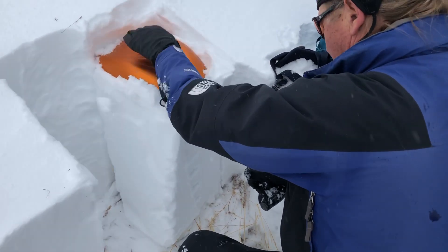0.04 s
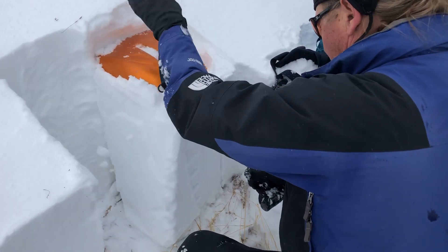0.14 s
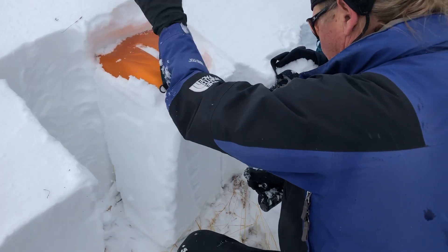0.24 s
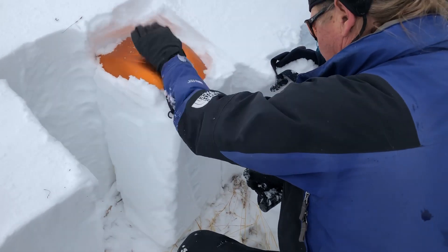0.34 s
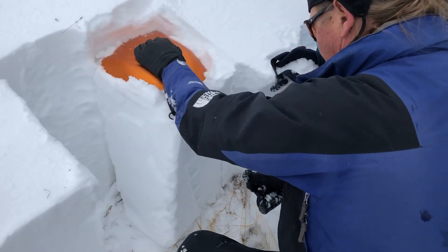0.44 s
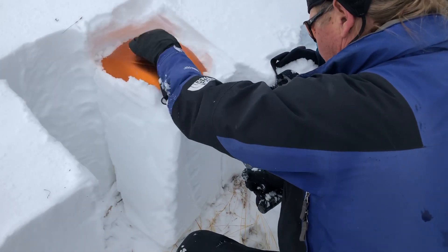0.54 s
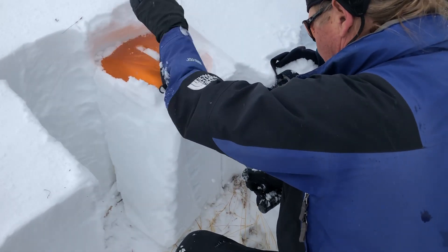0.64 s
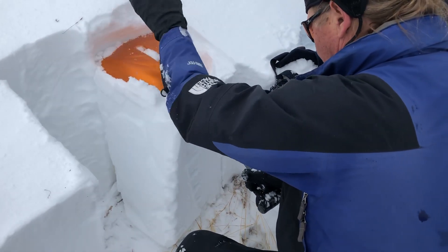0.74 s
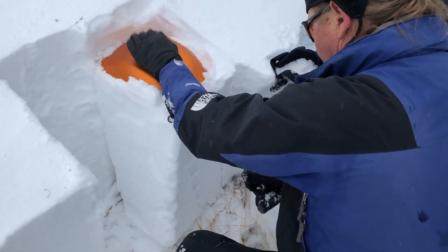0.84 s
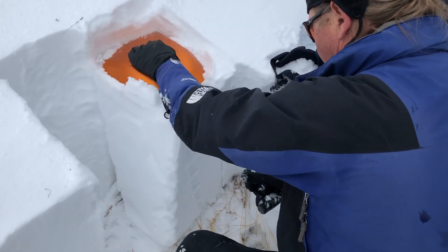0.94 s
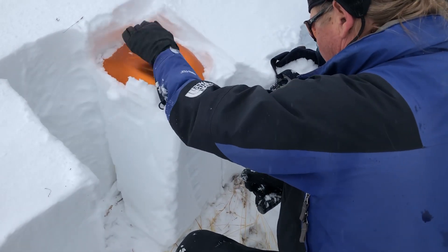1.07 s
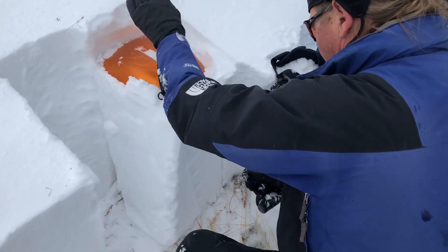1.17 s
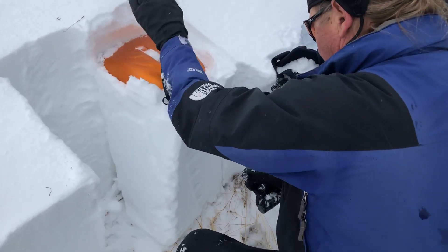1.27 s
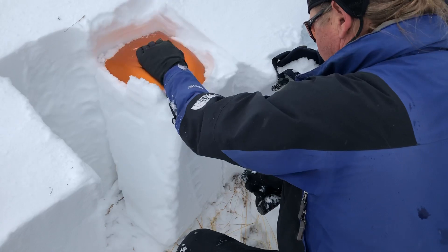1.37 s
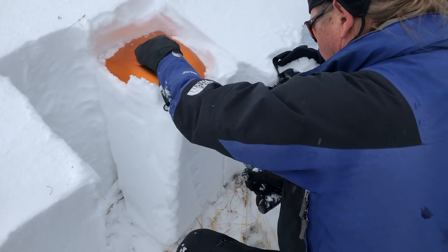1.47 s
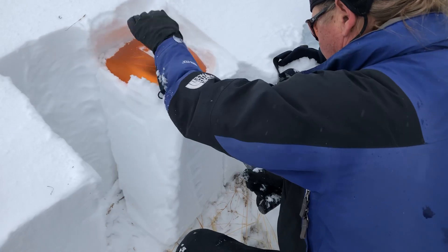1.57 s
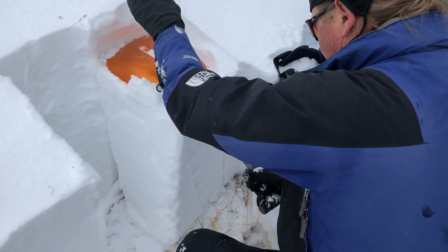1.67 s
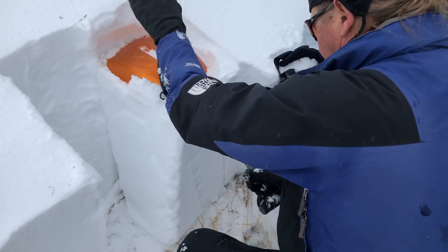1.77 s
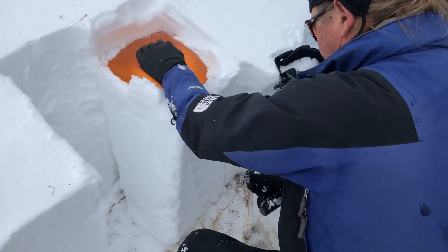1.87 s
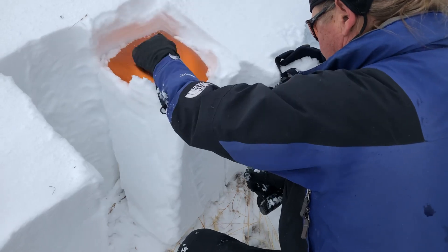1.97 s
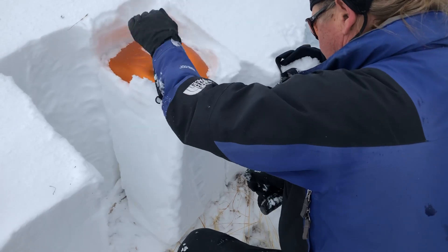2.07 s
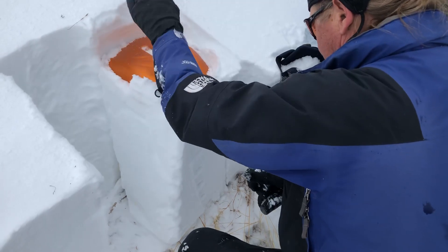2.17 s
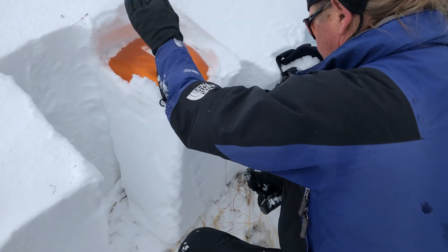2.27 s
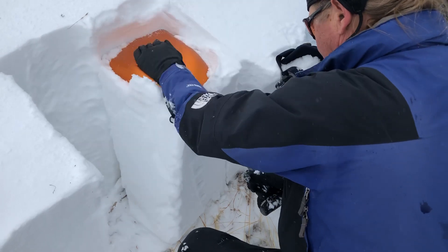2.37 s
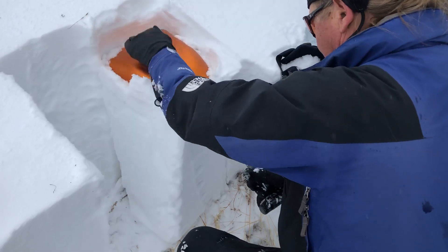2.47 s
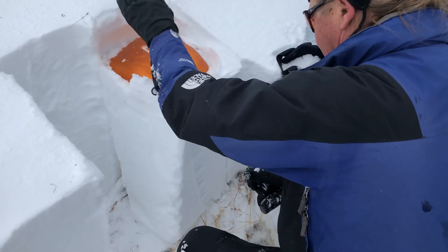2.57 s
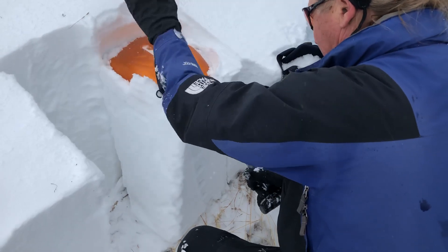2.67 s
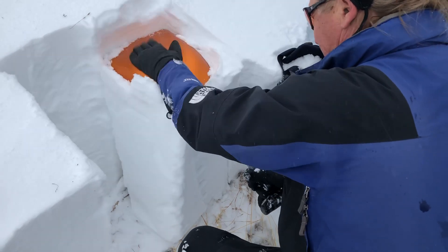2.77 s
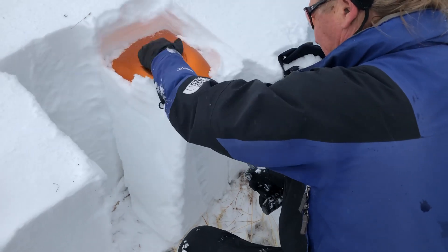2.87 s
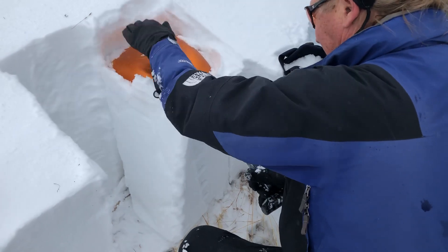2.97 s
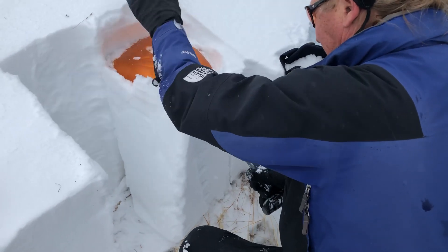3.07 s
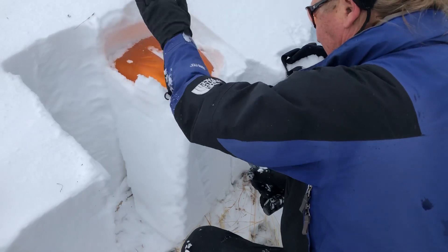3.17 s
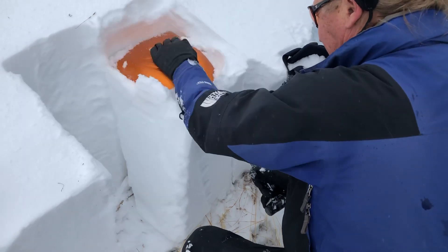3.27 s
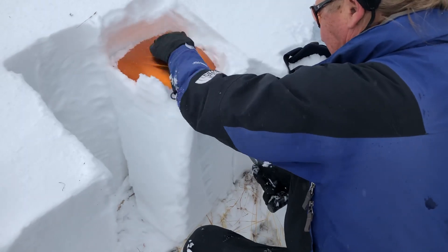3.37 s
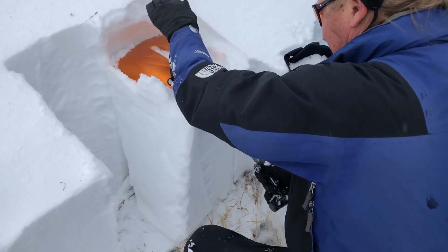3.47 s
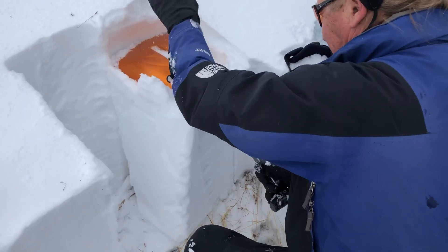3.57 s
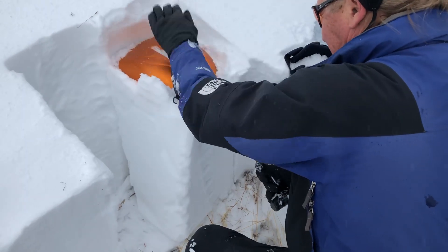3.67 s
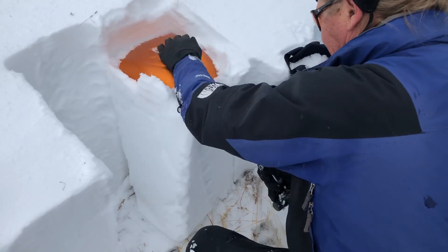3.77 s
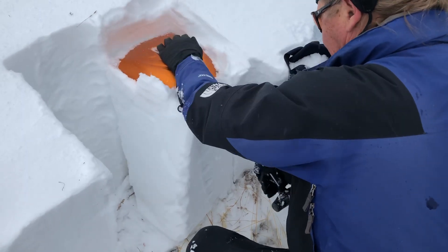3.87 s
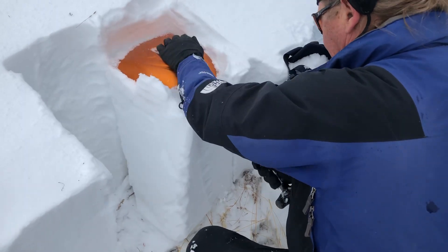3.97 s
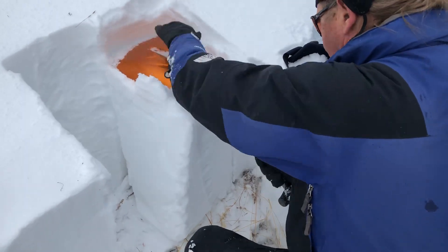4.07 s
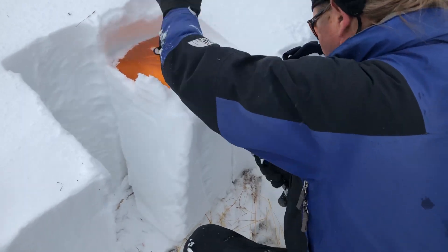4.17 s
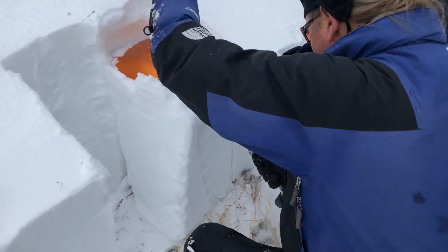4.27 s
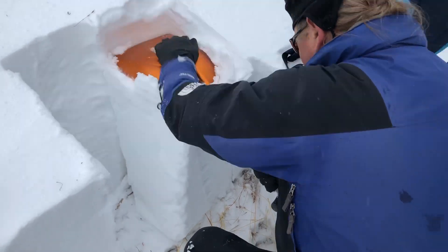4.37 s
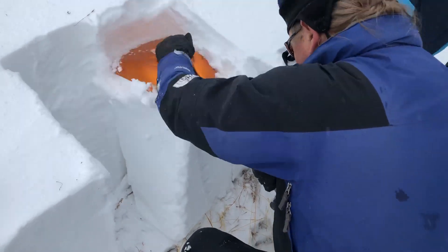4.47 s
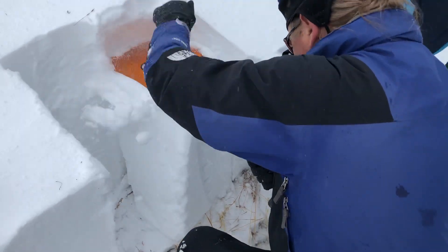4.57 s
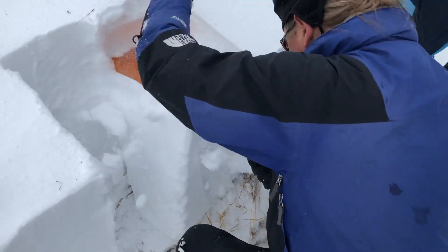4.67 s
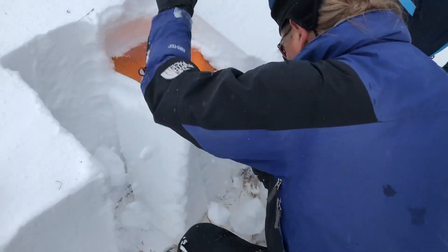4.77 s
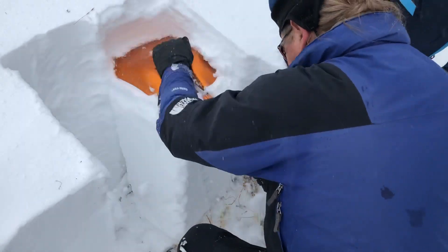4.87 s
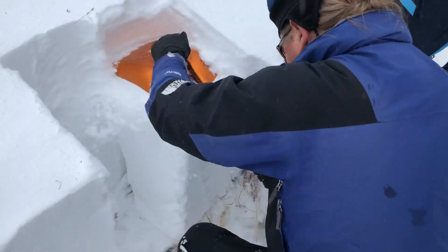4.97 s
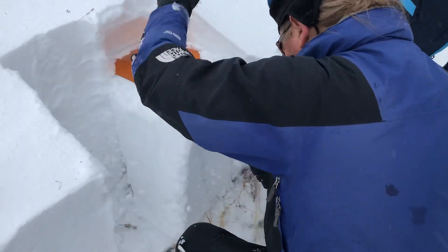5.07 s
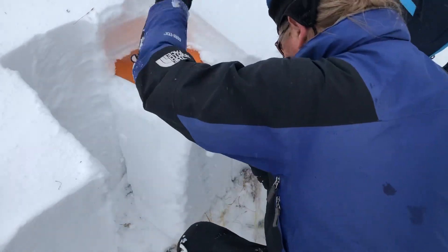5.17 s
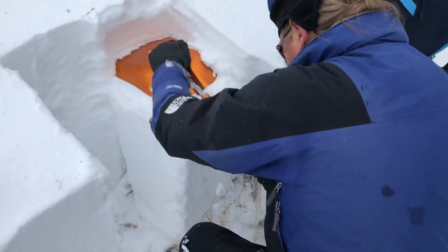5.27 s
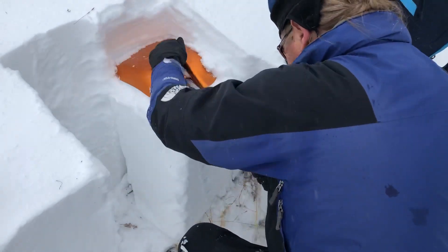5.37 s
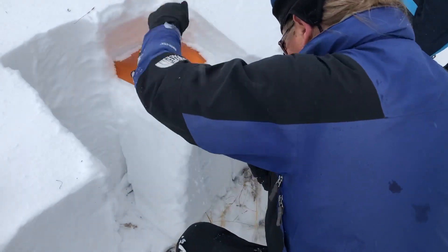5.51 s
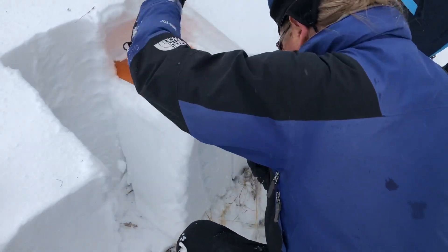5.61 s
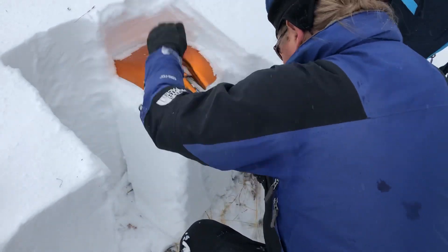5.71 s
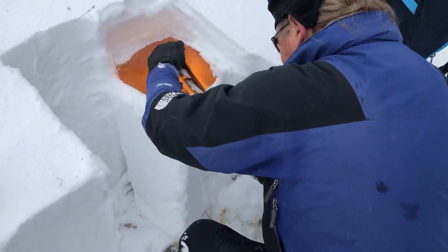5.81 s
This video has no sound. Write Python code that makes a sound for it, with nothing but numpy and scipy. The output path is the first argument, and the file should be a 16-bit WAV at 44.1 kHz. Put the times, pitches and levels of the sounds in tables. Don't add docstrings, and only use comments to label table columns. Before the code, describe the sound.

Outdoors on open snow, a gloved hand pats a metal shovel blade lying on a snow block, roughly twice a second. Each hit is a short crunch, a damped slap and a deep thump. The later hits are harder, and snow crumbs tick and trickle down more. Light wind rumbles on a phone microphone about an arm's length away, with no echo.

```python
import sys
import numpy as np
from scipy import signal
from scipy.fft import rfft, irfft
from scipy.io import wavfile
from scipy.ndimage import uniform_filter1d

SR = 44100
rng = np.random.default_rng(int(sys.argv[2]) if len(sys.argv) > 2 else 0)


def attenuation_scalar(level_db):
    decades = np.asarray(level_db, float) / 20
    return 10 ** decades


def transcribe(u):
    v = np.clip(np.atleast_2d(u).T, -1, 1)
    q = np.round(v * 32767).astype(np.int16)
    wavfile.write(sys.argv[1], SR, q)


N = 257717

# slap in seconds, strength in dB, glove contact before the slap in ms,
# slap over crunch in dB, brightness in dB.
PATS = [(0.41, 5.5, 5.2, 13.5, -9.5), (0.908, -5.5, 5.6, 0.5, -2), (1.408, -0.3, 4.79, 9, -7),
        (1.8796, 3.5, 4.9, 13, -13.5), (2.3609, -3, 4.9, 13.5, -5.5), (2.8299, -1.3, 3.0, 10, -9),
        (3.287, 6, 5.1, 19.5, -8.5), (3.724, -0.7, 6.6, 0.5, 0.2), (4.4284, 10, 4.2, 17, -1.5),
        (4.8849, 5, 5.4, 10, 0), (5.3308, 4.5, 4.6, 17, -2), (5.777, 3, 3.1, 7, 2.6)]
# time in seconds, level in dB.
STIR = [(0.0, -76.5), (0.52, -68.5), (0.65, -77), (1.36, -76), (1.53, -74), (2.32, -74.5), (2.47, -68.5),
        (3.12, -74), (3.67, -70), (4.1, -57.5), (4.77, -56.5), (5.07, -62.5), (5.84, -59.5)]
STILL_DB = -73.5
# frequency in Hz, density in dB per Hz.
DUST = [(300, -19.5), (1000, -0.5), (2000, -2.5), (3200, -0.5), (7200, -3), (11000, -9), (15400, -10),
        (15900, -41.5)]
# frequency in Hz, density in dB per Hz.
WIND = [(22, 38), (32, 33), (45, 20), (60, 7), (85, -4), (180, -7), (300, -18), (600, -40), (15000, -90)]


def coloured(points):
    hz, db = np.transpose(points)
    log_hz = np.log(np.arange(1, N // 2 + 2) * SR / N)
    gain = attenuation_scalar(np.interp(log_hz, np.log(hz), db))
    x = irfft(rfft(rng.standard_normal(N)) * gain, N)
    return x / np.std(x)


def band(x, hz, width_hz):
    return signal.lfilter(*signal.iirpeak(min(hz, .45 * SR), hz / width_hz, fs=SR), x)


def between(x, lo_hz, hi_hz):
    sos = signal.butter(2, [lo_hz, min(hi_hz, .45 * SR)], "band", fs=SR, output="sos")
    return signal.sosfilt(sos, x)


def walk(rate_hz):
    k = int(SR / rate_hz)
    steps = np.repeat(rng.standard_normal(N // k + 1), k)
    return 1.3 * uniform_filter1d(uniform_filter1d(steps, k), k)[:N]


def add(out, start_s, x):
    i = max(int(start_s * SR), 0)
    out[i:i + len(x)] += x[:N - i]


def stirring():
    return np.interp(np.arange(N) / SR, *np.transpose(STIR)) - STILL_DB


def air():
    # time in seconds, level in dB.
    breeze = [(0, -66.5), (.6, -72), (1.1, -71), (1.45, -61), (2.0, -58.5), (2.3, -62), (2.6, -70.5),
              (3.5, -71), (3.9, -61), (4.4, -63), (4.7, -65), (5.84, -56)]
    # frequency in Hz, density in dB per Hz.
    hush_spectrum = [(100, -3.5), (180, 1), (300, 2.5), (500, -7), (1000, -9.5), (2000, -16), (5000, -20),
                     (15500, -22)]
    hush_db, hush_share, settle_db, settle_s = -66.5, 0.32, -66, 0.081
    dust_db, dust_share = -78, 0.86
    t_s = np.arange(N) / SR
    stir_db = stirring()

    breeze_db = np.interp(t_s, *np.transpose(breeze)) + 25
    wind = coloured(WIND) * attenuation_scalar(breeze_db + 2.5 * walk(20))

    settle = sum((t_s > s) * np.exp(-np.abs(t_s - s) / settle_s) for s, *_ in PATS)
    hush_level = attenuation_scalar(hush_db + hush_share * stir_db) + attenuation_scalar(settle_db) * settle
    hush = coloured(hush_spectrum) * hush_level * attenuation_scalar(1.4 * walk(9) + 1.2 * walk(37))

    flicker_db = 1.5 * walk(40) + 1.6 * walk(360)
    dust = coloured(DUST) * attenuation_scalar(dust_db + dust_share * stir_db + flicker_db)
    return wind + hush + dust


def whines():
    # start in seconds, end in seconds, level in dB, pitch in Hz.
    strap_tones = [
        (0.0052, .38, -76.5, 1520),
        (.5, .69, -77, 1970),
        (0.021, 4.6, -90, 10100),
    ]
    out = np.zeros(N)
    for start_s, end_s, db, hz in strap_tones:
        noise = rng.standard_normal(int((end_s - start_s) * SR))
        tone = band(band(noise, hz, 190), hz, 190)
        add(out, start_s, attenuation_scalar(db) * tone / np.std(tone) * np.hanning(len(tone)) ** .5)
    return out


def trickle():
    # resonance in Hz, level in dB.
    grain_sizes = [(550, -5), (1000, -4), (1900, -3), (3600, -4), (6800, -5)]
    grains_per_s, grain_db, spread_db, stir_share = 300, -66.5, 5.5, 1.1
    out = 0
    for hz, db in grain_sizes:
        lands = rng.random(N) < grains_per_s / len(grain_sizes) / SR
        size_db = spread_db * np.minimum(rng.exponential(size=N), 2)
        hits = lands * attenuation_scalar(db + size_db) * rng.choice([-1, 1], N)
        out = out + band(band(hits, hz, 1.1 * hz), hz, 1.1 * hz) * SR / hz / 4
    return out * attenuation_scalar(grain_db + stir_share * stirring())


def buffets():
    # time in seconds, level in dB.
    eddies = [(.02, -60), (.15, -62.5), (0.498, -54.5), (1.019, -56.5), (1.2, -55.5), (1.35, -49),
              (1.458, -46), (1.66, -61), (1.79, -50), (1.968, -48.5), (2.04, -56.5), (2.161, -56),
              (2.278, -47.5), (2.409, -51), (3.351, -65), (3.695, -56), (3.769, -51.5), (3.87, -59.5),
              (4.008, -57), (4.074, -49.5), (4.203, -43), (4.489, -49), (4.8, -47), (4.938, -50.5),
              (5.39, -63)]
    eddy_ms, top_hz_at_55, hz_per_db = 56, 150, 4.5
    out, wind = np.zeros(N), coloured(WIND)
    shape = np.hanning(int(1.5 * eddy_ms * SR / 1000))
    for s, db in eddies:
        top_hz = top_hz_at_55 + hz_per_db * (db + 55)
        stretch = np.roll(wind, -int(s * SR))[:SR // 2]
        rumble = shape * between(stretch, 55, top_hz)[-len(shape):]
        size = np.std(between(rumble, 70, 300))
        add(out, s - .012 - len(shape) / SR / 2, attenuation_scalar(db - 1.0) * rumble / size)
    return out


def pings():
    # time in seconds, peak in dB, centre in Hz.
    crystals = [(0.2586, -55, 6200), (1.6844, -47.5, 4520), (1.9074, -39, 5050), (1.9948, -45, 6750),
                (2.0284, -49.5, 4500), (2.3063, -50, 7200), (2.8904, -45, 5230), (3.2402, -46, 5020),
                (3.576, -55, 6020), (3.61, -42.5, 7060), (4.21, -41, 3700), (4.2507, -46, 7350),
                (4.2816, -46, 4900), (4.5253, -40, 5030), (4.78, -50, 4120), (4.8429, -44, 4330),
                (5.175, -49, 3540), (5.5302, -32, 4320), (5.624, -52, 3860), (5.7086, -49, 4900)]
    out = np.zeros(N)
    t_ms = np.arange(SR // 100) / SR * 1000
    for s, db, hz in crystals:
        burst = rng.standard_normal(len(t_ms)) * np.exp(-t_ms / 0.9)
        snap = between(burst, 0.62 * hz, 1.67 * hz)
        add(out, s, attenuation_scalar(db) * snap / np.abs(snap).max())
    return out


def rustles():
    # start in seconds, end in seconds, level in dB.
    slides = [
        (0, 0.074, -66.5),
        (1.99, 2.04, -72.5),
        (2.838, 2.903, -57.5),
        (3.725, 3.776, -60.5),
        (3.84, 4.11, -64),
        (4.5, 4.56, -78),
        (4.484, 4.706, -68),
        (4.952, 5.043, -60),
    ]
    lift_after_s, lift_s, lift_db, rustle_hz = 0.0083, 0.16, -72.5, 4700
    out = np.zeros(N)
    hiss = coloured(DUST) * attenuation_scalar(2.6 * walk(64) + 0.82 * walk(500))
    lifts = [(s + lift_after_s, s + lift_after_s + lift_s, lift_db) for s, *_ in PATS]
    for start_s, end_s, db in [*lifts, *slides]:
        part = hiss[int(start_s * SR):int(end_s * SR)]
        grainy = band(part, rustle_hz, 4.4 * rustle_hz) + .6 * part
        add(out, start_s, attenuation_scalar(db) * grainy * signal.windows.tukey(len(part), .75))
    return out


def ticks():
    # time in seconds, peak in dB.
    glove_peels = [
        (0.485, -37),
        (0.991, -37),
        (1.48, -35),
        (1.948, -38.5),
        (2.444, -36),
        (2.908, -40.5),
    ]
    # time in seconds, peak in dB, snap over knock in dB.
    snow_crumbs = [(0.002, -39.5, -34), (0.429, -44, -20), (1.194, -56.5, -6.5), (1.709, -57, 1),
                   (2.672, -56.5, 2), (3.444, -51, -32), (3.509, -51, -11), (3.563, -42, -12),
                   (3.643, -46, -11), (3.664, -50.5, -1.5), (3.91, -42, -24), (3.969, -53, -2),
                   (4.075, -41, -6), (4.089, -47, -13), (4.141, -56, 11), (4.167, -53, -19),
                   (4.214, -41.5, -35), (4.281, -46.5, -24), (4.358, -51, 2), (4.778, -47, -19),
                   (4.797, -36, -24), (4.994, -41.5, -6), (5.028, -43, -24), (5.17, -45, -24.5),
                   (5.195, -44, -21), (5.271, -42, -10), (5.535, -46.5, -13), (5.578, -46.5, -13),
                   (5.717, -43, -4)]
    peel_snap_db, peel_hz, crumb_hz = -3, 1090, 885
    events = [(*p, peel_snap_db, peel_hz) for p in glove_peels]
    events += [(*c, crumb_hz) for c in snow_crumbs]
    out = np.zeros(N)
    t_ms = np.arange(SR // 40) / SR * 1000
    for s, db, snap_db, hz in events:
        burst = rng.standard_normal(len(t_ms)) * t_ms / 1.2 * np.exp(1 - t_ms / 1.52)
        knock = between(burst, .5 * hz, 1.9 * hz)
        snap = between(burst * np.exp(-t_ms / 3), 1800, 6500)
        tick = knock / np.abs(knock).max() + attenuation_scalar(snap_db) * snap / np.abs(snap).max()
        add(out, s + 0.00045, attenuation_scalar(db) * tick)
    return out


def cushions():
    puff_db, puff_ms, puff_hz = -59, 13, 450
    out = np.zeros(N)
    k = int(puff_ms * SR / 1000)
    for s, db, lead_ms, *_ in PATS:
        puff = between(rng.standard_normal(k), .4 * puff_hz, 1.8 * puff_hz)
        level = attenuation_scalar(puff_db + .6 * db) / np.std(puff)
        add(out, s - lead_ms / 1000 - k / SR, level * puff * np.linspace(0, 1, k))
    return out


def shoves():
    # palm in seconds, peak in dB, contact in ms, fingers earlier by ms, fingers in dB.
    palm_shoves = [(0.4121, -6.5, 0.57, 1.13, -10.5), (0.9099, -3, 0.28, 4.26, -21.5),
                   (1.409, -6, 0.35, 4.6, -18.5), (1.882, -6.5, .3, 6.0, -15),
                   (2.3635, -16, 0.29, 1.02, -17), (2.8352, -9, 0.66, 3.9, -15.5),
                   (3.2911, -2.5, 0.2, 3.0, -4), (3.7263, -5.5, 0.34, 3.83, -10),
                   (4.4344, 3, 0.42, 3.2, -6.5), (4.8866, 6.5, 0.64, 4.37, -5.5),
                   (5.3341, 1.5, 0.8, 3.6, -17), (5.781, 1.5, 0.31, 1.46, -4.5)]
    finger_ms, rebound_share, rebound_hz = .75, 0.27, 70
    out = np.zeros(N)
    t_ms = np.arange(SR // 30) / SR * 1000

    def pulse(db, ms):
        return -attenuation_scalar(db - 0.64) * t_ms / (ms + 0.2) * np.exp(1 - t_ms / (ms + .25))

    for s, db, contact_ms, early_ms, finger_db in palm_shoves:
        add(out, s - .0002, pulse(db, contact_ms))
        add(out, s - .0002 - early_ms / 1000, pulse(finger_db, finger_ms))
    lag = np.exp(-2 * np.pi * rebound_hz / SR)
    rebound = rebound_share * signal.lfilter([1 - lag], [1, -lag], out)
    return uniform_filter1d(out - rebound, size=36)


def blade(force):
    # mode in Hz, width in Hz, level in dB.
    sheet_modes = [(330, 160, -2), (600, 250, -3), (820, 350, 0), (1150, 400, -4), (1900, 450, -2),
                   (2620, 300, -5), (3070, 400, -5), (4400, 1000, -6), (6440, 500, -9), (7470, 600, -10),
                   (10500, 4000, -14)]
    stretch = 1 + .04 * rng.standard_normal(len(sheet_modes))
    return sum(attenuation_scalar(db) * band(force, hz * k, width_hz)
               for (hz, width_hz, db), k in zip(sheet_modes, stretch))


def shade(x, tone_db):
    group_edges_hz = (320, 1100, 2300, 4500, 9000, 16500)
    spectrum = rfft(x)
    group = np.digitize(np.arange(len(spectrum)) * SR / len(x), group_edges_hz)
    gain = np.zeros(len(spectrum))
    for k, db in enumerate(tone_db):
        inside = group == k + 1
        energy = 2 * np.sum(np.abs(spectrum[inside]) ** 2) / len(x)
        gain[inside] = attenuation_scalar(db) / np.sqrt(energy)
    return irfft(spectrum * uniform_filter1d(gain, size=40), len(x))


def slaps():
    # frequency in Hz, density in dB per Hz.
    crunch_spectrum = [(300, -4), (900, 0), (2000, -2), (4000, -4), (7000, -6), (10000, -11), (15500, -15),
                       (16500, -35)]
    mode_db = (2.06, -0.44, 0.63, -0.8, -9)
    bright_share, strength_share = (0, 0.19, 0.97, 0.54, .4), (0.81, 0.82, 1, 0.66, 0.59)
    crunch_ms = 7.6
    out, spray = np.zeros(N), np.zeros(N)
    t_ms = np.arange(SR // 4) / SR * 1000
    onset = np.minimum(t_ms / .3, 1)
    for s, db, lead_ms, hard_db, bright_db in PATS:
        tone_db = np.add(mode_db, np.multiply(strength_share, db) + np.multiply(bright_share, bright_db))

        size_db = 3.0 * uniform_filter1d(rng.exponential(size=len(t_ms)), size=8)
        grains = attenuation_scalar(size_db) * rng.standard_normal(len(t_ms))
        swell_db = 7 * np.minimum(t_ms / lead_ms - 1, 0) - .7 * np.maximum(t_ms - lead_ms, 0)
        fade = 1 / (1 + np.exp(np.minimum((t_ms - crunch_ms + .5) / .6, 50)))
        crunch = between(grains, 1200, 17000) * onset * attenuation_scalar(swell_db) * fade

        impact = (t_ms > lead_ms - .6) * np.exp(-np.abs(t_ms - lead_ms) / .8)
        slap = between(impact * rng.standard_normal(len(t_ms)), 300, 6000)

        force = crunch + attenuation_scalar(hard_db + 2.5) * slap
        ring = blade(force) + .6 * between(force, 300, 11000)
        add(out, s - (lead_ms + .1) / 1000, onset * (t_ms < 100) * shade(ring, tone_db))

        fast = attenuation_scalar(tone_db[3] - 33.5) * np.exp(-t_ms / 6)
        slow = attenuation_scalar(tone_db[3] - 45.5) * np.exp(-t_ms / 25)
        add(spray, s, fast + slow)
    return out + spray * coloured(crunch_spectrum) * attenuation_scalar(3.0 * walk(250))


def scene():
    background = air() + whines() + trickle() + buffets()
    loose_snow = pings() + rustles() + ticks()
    pats = cushions() + shoves() + slaps()
    return (background + loose_snow + pats)[None]


def top_cut(x):
    return signal.sosfilt(signal.butter(12, 16830, fs=SR, output="sos"), x)


def record(dry):
    cut_hz, cut_q, smear_hz = 56.7, 0.68, 128
    w, v = 2 * np.pi * cut_hz, 2 * np.pi * smear_hz
    cut = np.hstack(signal.bilinear([1, 0, 0], [1, w / cut_q, w * w], SR))
    smear = np.hstack(signal.bilinear([1, 0, -v * v], [1, 2 * v, v * v], SR))
    swept = signal.sosfilt([cut, cut, cut, smear, smear, smear], dry)
    heard = 1.1 * np.tanh(swept / 1.1)
    top = signal.ellip(8, .2, 60, 16250, fs=SR, output="sos")
    return top_cut(signal.sosfilt(top, heard))


dry = scene()
out = record(dry)
transcribe(out)
```